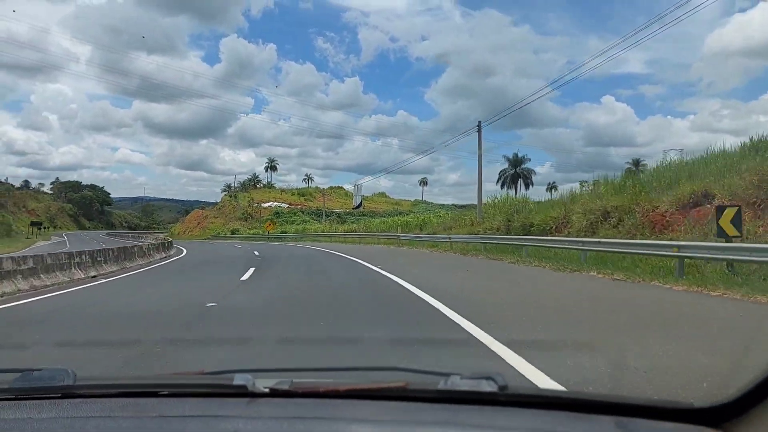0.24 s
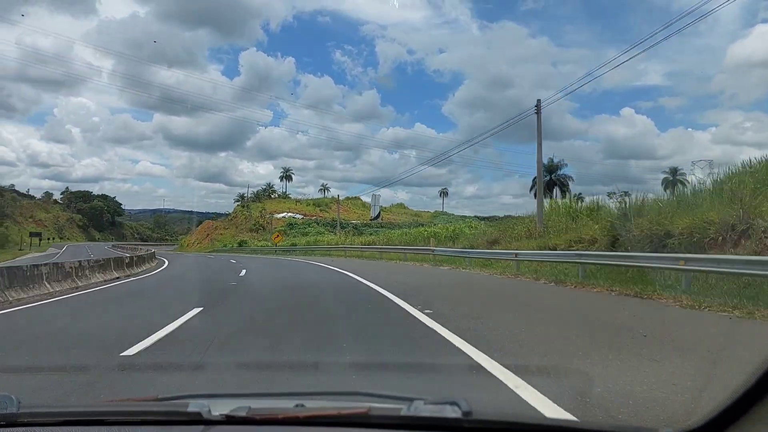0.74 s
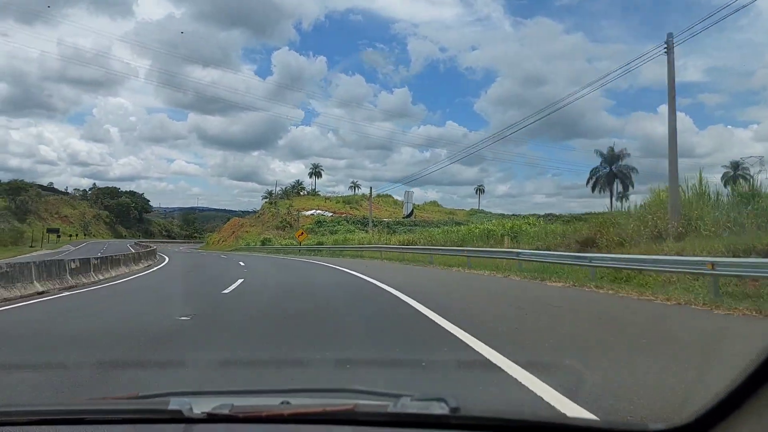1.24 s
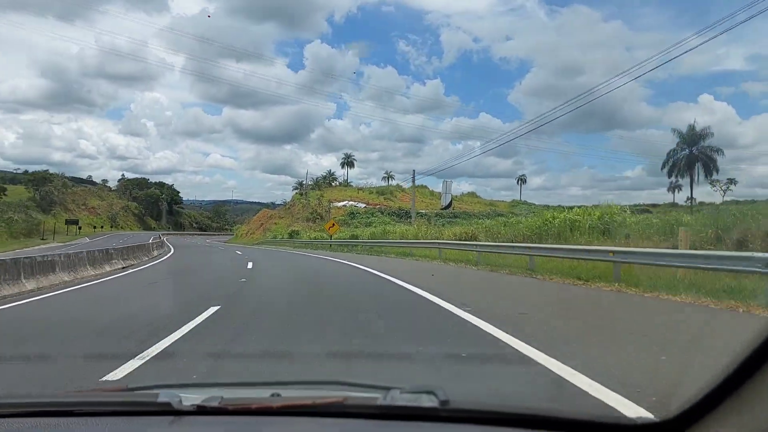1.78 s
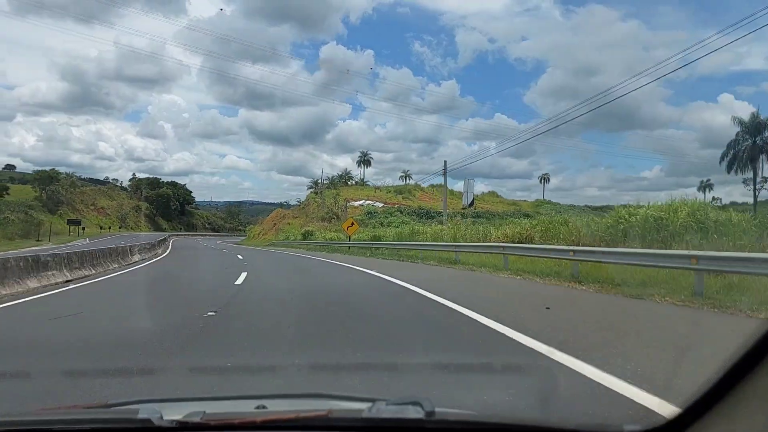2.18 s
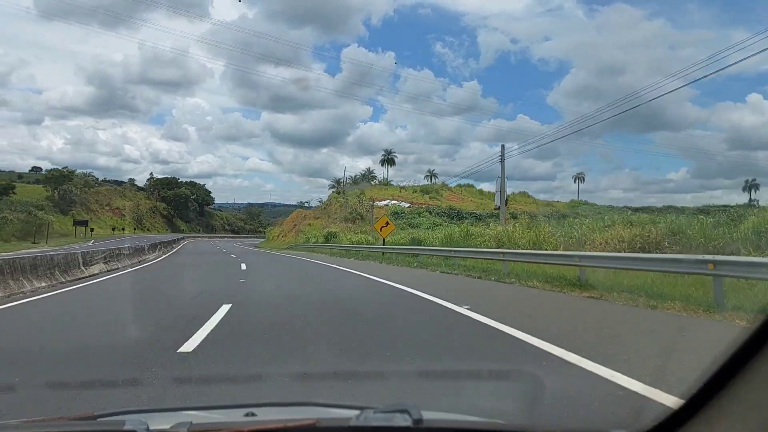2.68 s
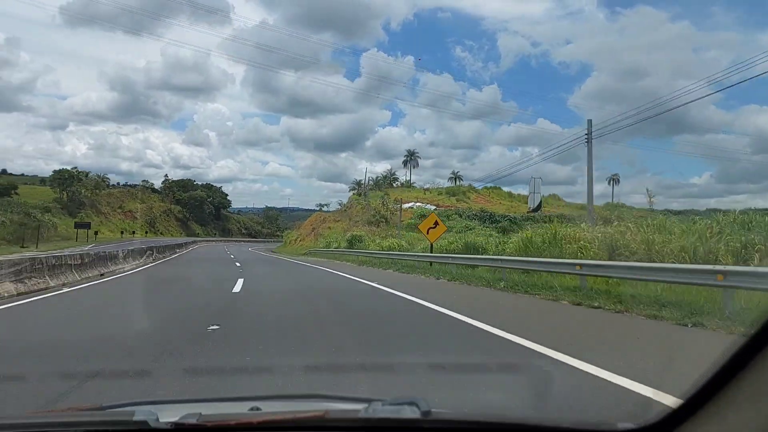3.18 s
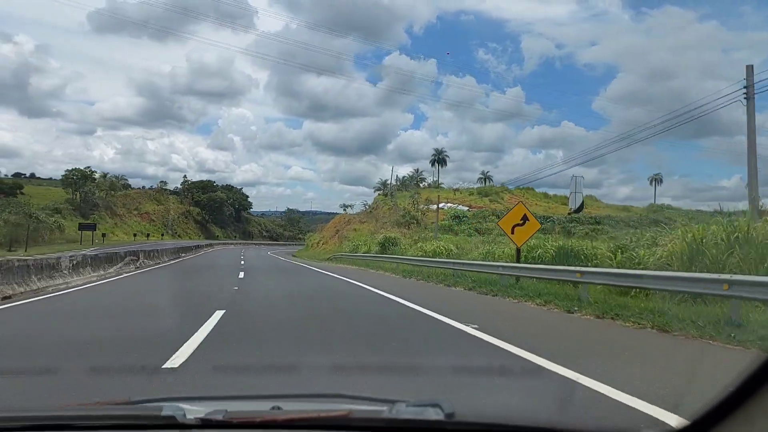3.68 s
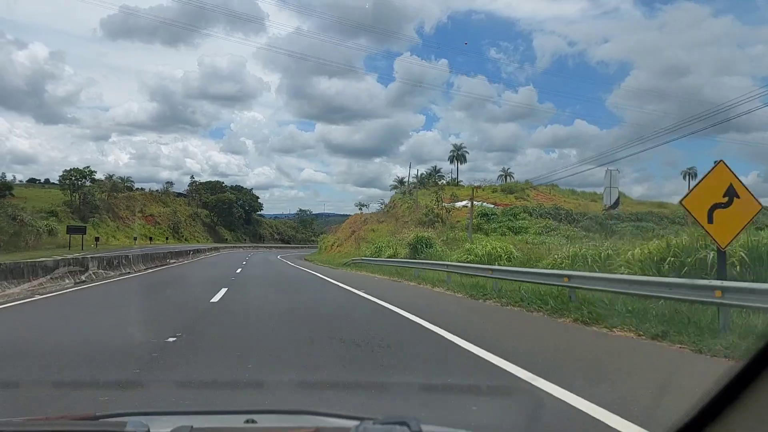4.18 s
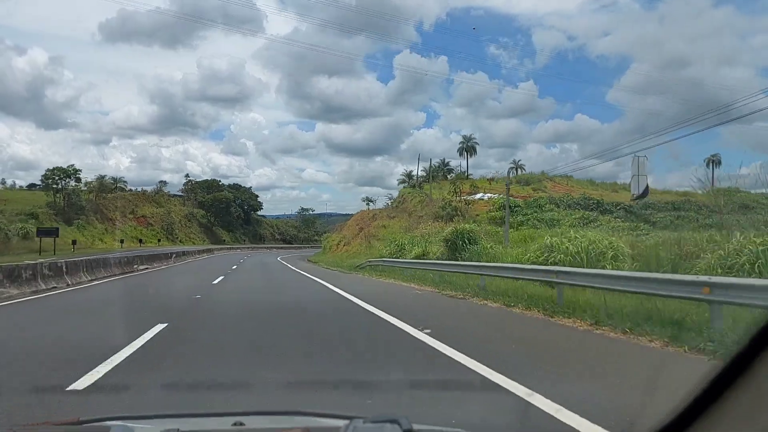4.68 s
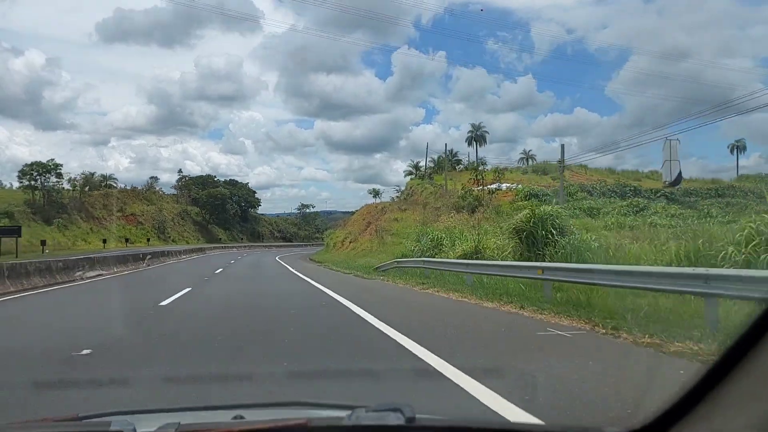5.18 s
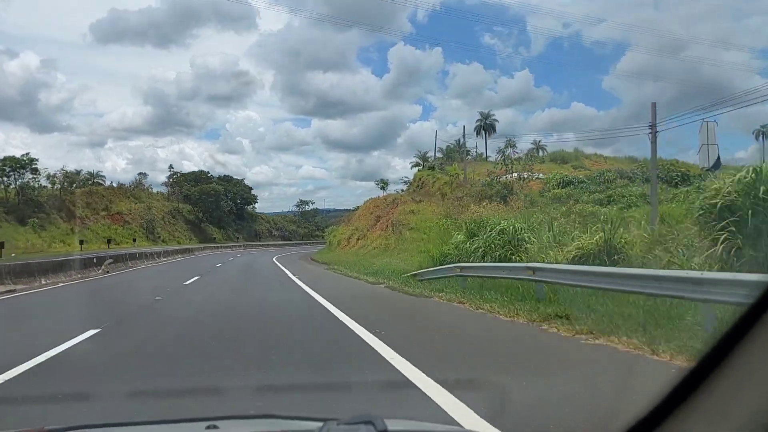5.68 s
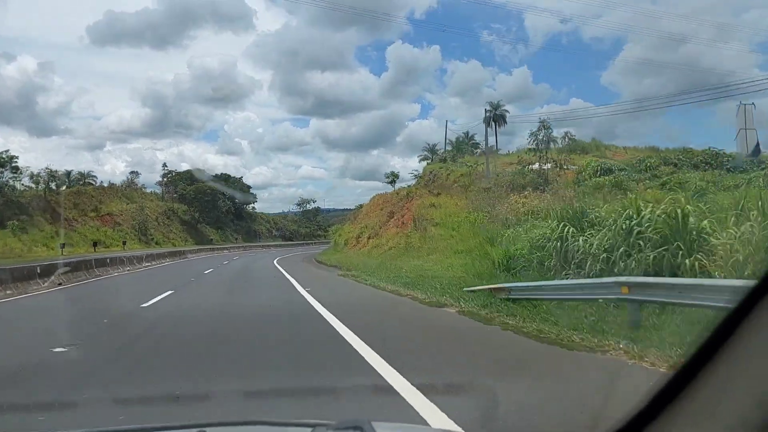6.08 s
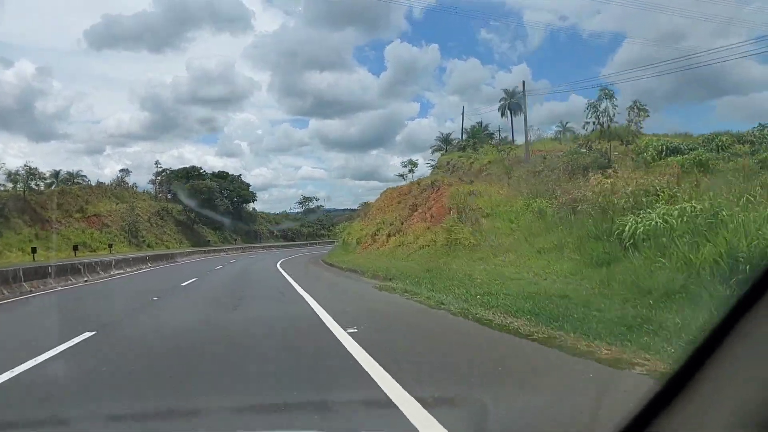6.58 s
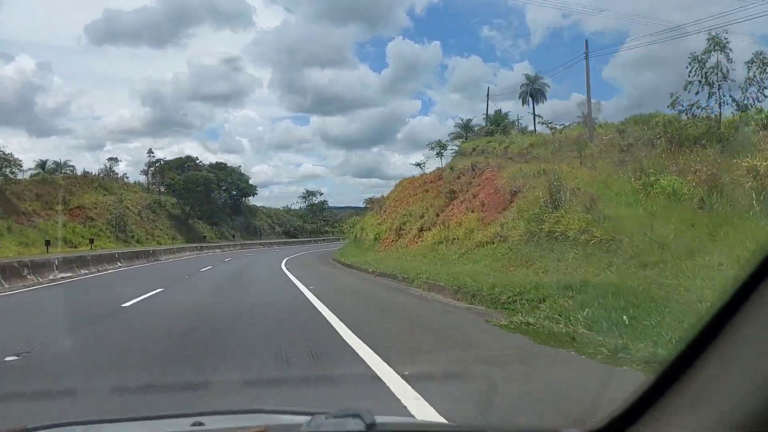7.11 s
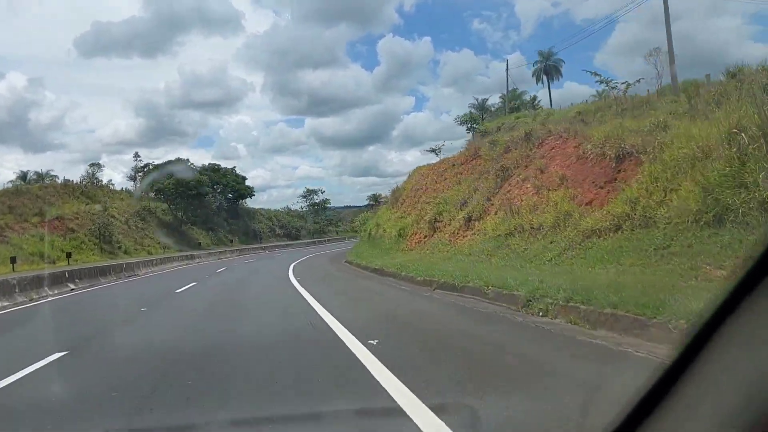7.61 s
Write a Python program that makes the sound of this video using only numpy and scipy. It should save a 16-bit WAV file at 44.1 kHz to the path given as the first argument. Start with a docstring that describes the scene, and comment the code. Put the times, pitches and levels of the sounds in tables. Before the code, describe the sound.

Inside a closed car cruising a highway bend, a deep throbbing boom and uneven road rumble sit under soft tyre roar, with dull bumps.

```python
"""A throbbing boom fills a car as it cruises through highway bends with the windows shut.
Slow tones that stray in strength and phase make the boom and the other wheel hums.
Coloured noise with moving levels makes the road's shake and rumble, the grit, the tread roar and the wind.
The shake and rumble swell as the body heaves; the boom throbs by itself, as near tones beat.
Short filtered pushes and bursts make the bumps, an early draught on the left, and the ticks of loose trim."""
import sys
import numpy as np
from scipy import signal
from scipy.fft import rfft, irfft
from scipy.io import wavfile
from scipy.ndimage import uniform_filter1d, map_coordinates

SR = 44100
rng = np.random.default_rng(int(sys.argv[2]) if len(sys.argv) > 2 else 0)


def transcribe(signal):
    """Save signal, clipped to [-1, 1], as a 16-bit WAV file at the path in sys.argv[1]."""
    frames = np.atleast_2d(signal).T
    limited = np.clip(frames, -1, 1)
    pcm = np.round(limited * 32767).astype(np.int16)
    wavfile.write(sys.argv[1], SR, pcm)


N = 346185
TIME = np.arange(N) / SR  # s
FREQS = np.maximum(np.fft.rfftfreq(N, 1 / SR), 1)  # Hz
SIDE_LAG_S = 0.00042  # how much later direct tread and wind noise reaches the left

# Base level that the tread roar, grit and wind follow: (time [s], level [dB])
RUSH_LEVEL = [(0, -40.5), (.17, -40), (.28, -38.6), (.45, -40.5), (.61, -39.5), (.66, -44), (.85, -41.5),
              (1.2, -43), (1.5, -42), (2.1, -42.5), (2.25, -40.5), (2.75, -39), (2.9, -40.5), (3.9, -40.5),
              (4.05, -41), (4.9, -40.5), (5.9, -38.5), (6.1, -40), (6.55, -39), (6.7, -40), (7.85, -38.5)]
# Coarseness of the asphalt, as a lift of the grit; the dull roar takes a share: (time [s], lift [dB])
ASPHALT_GRAIN = [(0, -0.5), (1.7, -0.5), (3.2, 1), (5.2, -0.5), (7.85, 3)]


def from_db(db):
    """Turn decibels into gain."""
    return 10 ** (np.asarray(db) / 20)


def rms_one(x):
    """Scale a signal to unit power."""
    return x / np.sqrt(np.mean(x ** 2) + 1e-20)


def in_time(rows):
    """Draw each column of a time table as a curve with a value at every sample."""
    times, *columns = np.transpose(rows)
    return [np.interp(TIME, times, column) for column in columns]


def in_frequency(rows):
    """Draw each column of a spectrum as a curve over the logarithm of frequency."""
    hz, *columns = np.transpose(rows)
    return [np.interp(np.log(FREQS), np.log(hz), column) for column in columns]


def drift(rate):
    """Wander smoothly and at random with spread 1, changing about rate times a second."""
    points = rng.standard_normal(1000)
    return rms_one(map_coordinates(points, [TIME * rate + 2], order=2, mode="wrap"))


def swells(times, heights_db, length_s):
    """Add up smooth rises or dips in dB; each is length_s wide where it has fallen to 1/e."""
    return sum(db * np.exp(-(2 * (TIME - s) / length_s) ** 2) for s, db in zip(times, heights_db))


def throbbing(phase, unsteady, rate):
    """Make a tone whose strength and phase both stray at random."""
    in_step = (1 + unsteady * drift(rate)) * np.sin(phase)
    out_of_step = unsteady * drift(rate) * np.cos(phase)
    return in_step + out_of_step


def two_sided(colour_db, lag_s):
    """Mix direct noise, which reaches the left later, with diffuse noise that differs on each side."""
    # What the two sides share: (frequency [Hz], share of power that is direct [0-1], left minus right [dB])
    sides = [(45, 0.91, -5), (86, 0.59, -2.5), (138, 0.75, 1.5), (298, 0.5, -0.5), (436, 0.54, 1.5),
             (600, 0.51, 0), (1010, 0.72, 0), (1250, 0.74, -0.5), (1750, 0.37, -2), (2050, 0.35, -2),
             (2360, 0.09, -1.5), (2940, 0.55, -0.5), (5040, 0, 1), (8000, 0.07, -1), (13000, 0, -3)]
    direct, pan_db = in_frequency(sides)
    source, left, right = rfft(rng.standard_normal((3, N)))
    delayed = source * np.exp(-2j * np.pi * FREQS * lag_s)
    left = np.sqrt(direct) * delayed + np.sqrt(1 - direct) * left
    right = np.sqrt(direct) * source + np.sqrt(1 - direct) * right
    return np.array([left, right]) * from_db(colour_db + np.array([pan_db, -pan_db]) / 2)


def cabin_noise(colour_db, lag_s):
    """Turn a two-sided noise spectrum into stereo sound of unit power."""
    return rms_one(irfft(two_sided(colour_db, lag_s), N))


def steadied(x, span_s):
    """Even out the noise's own swells that last longer than the span."""
    power = uniform_filter1d(np.mean(x ** 2, axis=0), int(span_s * SR))
    return x / np.sqrt(power + 1e-9)


def burst(low_hz, high_hz, t60, alike):
    """Start a stereo band of noise at once and let it die by 60 dB in t60 seconds; peak 1."""
    t = TIME[:SR // 2]
    shared, *own = rng.standard_normal((3, len(t)))
    noise = np.sqrt(alike) * shared + np.sqrt(1 - alike) * np.array(own)
    fading = noise * from_db(-60 * t / t60)
    band = signal.butter(2, [low_hz, high_hz], "band", fs=SR, output="sos")
    x = signal.sosfilt(band, signal.sosfilt(band, fading))  # twice, for steep edges
    return x / np.abs(x).max()


def thump(low_hz, high_hz, t60, shudder_db, alike):
    """Join one sharp push, dulled gradually above its band, to a shudder of noise; peak 1."""
    push = (TIME[:SR // 2] == 0).astype(float)
    band = signal.butter(2, [low_hz, high_hz], "band", fs=SR, output="sos")
    soften = signal.butter(2, high_hz, fs=SR, output="sos")
    knock = signal.sosfilt(soften, signal.sosfilt(band, push))
    shudder = from_db(shudder_db) * burst(low_hz, high_hz, t60, alike)
    x = knock / np.abs(knock).max() + shudder
    return x / np.abs(x).max()


def add(out, s, x):
    """Mix a short sound in at a time in seconds."""
    at = round(s * SR)
    out[:, at:at + x.shape[1]] += x[:, :N - at]


def wheels(throb_db, boom_db=-5.0, beat=0.21, steadying=0.053, stray=0.4, stray_rate=13, spread=0.52):
    """Out-of-round tyres shake the body; the fourth order (4 per turn) meets the cabin's lowest air mode."""
    # Wheel speed: (time [s], speed [turns per s])
    wheel_speed = [(0, 15.0), (.5, 15.12), (1.4, 15.08), (2.2, 14.8), (3.2, 14.65), (4.0, 14.7),
                   (4.7, 14.82), (5.4, 15.02), (7.85, 15.0)]
    # Boom before boom_db and its throb: (time [s], level [dB])
    boom_curve = [(0, -29), (.3, -26), (.7, -18.5), (1.1, -29.5), (1.3, -25.5), (1.55, -22.5), (1.8, -24),
                  (2.2, -28.5), (2.6, -23.5), (3.1, -21), (3.3, -25.5), (3.6, -20), (4.1, -19.5),
                  (4.6, -16.5), (5.1, -17), (5.88, -17.5), (6.0, -30.5), (6.4, -25.5), (6.57, -18.5),
                  (6.75, -32), (7.05, -27), (7.3, -37), (7.55, -19.5), (7.85, -25)]
    # Pitches of the other hums: multiples of the wheel's turning rate
    order_multiples = [3, 8, 10, 12, 20.2]
    # One row for each of those hums: (level [dB], share of the boom curve's swing that it follows)
    order_levels = [(-43, 0), (-38.5, 0.89), (-38, 0.32), (-47, .3), (-44, 0)]
    # Air ringing inside the tyres: (time [s], level [dB])
    tyre_air = [(0, -49), (.9, -47), (1.6, -38.5), (2.3, -35), (3.2, -34.5), (4.2, -43.5), (5.3, -37),
                (6.2, -37.5), (7.0, -43), (7.85, -36)]

    angle = 2 * np.pi * np.cumsum(in_time(wheel_speed)[0]) / SR
    level = in_time(boom_curve)[0]
    swing = level - level.mean()
    unsteady = beat * np.exp(-steadying * swing)  # a strong boom strays less
    boom = throbbing(4 * angle, unsteady, rate=28)
    out = np.sqrt(2) * from_db(level + boom_db + throb_db) * boom * np.ones((2, 1))

    hums = [(multiple, db + follows * swing)
            for multiple, (db, follows) in zip(order_multiples, order_levels)]
    hums.append((15.2, in_time(tyre_air)[0]))  # the tyre air rings at this multiple
    for multiple, level_db in hums:
        # four wheels slip in and out of step, so each hum swells and breaks up
        phase = multiple * angle + spread * drift(3.4) * np.array([[1], [-1]])
        out += from_db(level_db) * throbbing(phase, stray, stray_rate)
    return out


def heaves_and_throb():
    """The body's heaves change the shake and rumble; the boom has its own throb, as near tones beat."""
    # Swells and dips: (time [s], change of shake [dB], boom's own throb [dB], change of rumble [dB])
    swell_table = [(.06, 7, 17, 5.5), (.125, 9, 0, -3), (.24, 4, 9, 2), (.44, 6, -5, 2), (.6, 8, 8.5, 6.5),
                   (.75, 12, -6, -2), (1.37, 3.5, -8, 2), (1.97, 3.5, 5, -1), (2.05, 5, 13, -2),
                   (2.21, 2, 14, 5), (2.39, 11.5, 11, 2.5), (2.5, 7, 9, 5), (2.64, 8, 11.5, 8.5),
                   (2.79, 5, 8.5, 3), (3.0, -1, 11.5, 4.5), (3.1, -2, -3, 1), (3.38, 9.5, 9, -6),
                   (3.6, -5, 9, 1.5), (3.91, -2, 7, 2), (4.03, 4, 0.5, -10), (4.21, 9, 1.5, -0.5),
                   (4.37, -7, 3.5, -0.5), (4.64, -1, 2.5, 1.5), (4.89, 0.5, 2.5, -1.5), (5.27, 9, 3.5, 0.5),
                   (5.55, 5, -7, -2.5), (5.77, -3, 1.5, -2.5), (6.06, 0, 6, 0), (6.165, 0, 1, 7),
                   (6.28, -4, 8, 3.5), (6.5, -2, 1.5, 4.5), (6.84, 3, 10, 7.5), (7.18, 4.5, 7, 11.5),
                   (7.33, 5.5, 3, 2), (7.55, 3, -1.5, 2.5), (7.75, 4, -1, -1)]
    shake_s, short_s = 0.15, 0.062  # widths; the throb and the rumble use the short one
    s, shake_db, throb_db, rumble_db = np.transpose(swell_table)
    return swells(s, shake_db, shake_s), swells(s, throb_db, short_s), swells(s, rumble_db, short_s)


def road(shake_heave_db, rumble_heave_db, shake_db=-32.0, shake_share=0.77, rocking_db=2.5,
         rumble_db=-4.0, lumpy_db=2.0, surge_db=0.2):
    """Long waves in the road shake the body; shorter ones rumble in uneven lumps through the suspension."""
    # Roughness of the road, as the rumble's base level: (time [s], level [dB])
    road_roughness = [(0, -23.5), (.3, -23), (.62, -24), (.68, -28), (1.15, -28.5), (1.9, -24.5),
                      (2.4, -26), (3.1, -22.5), (3.3, -24), (3.7, -26), (3.9, -21.5), (4.4, -25),
                      (4.7, -21), (5.4, -28), (5.88, -23), (6.05, -29.5), (6.5, -25), (6.7, -29),
                      (7.05, -29), (7.6, -24.5), (7.85, -26.5)]
    # Colour of the shake: (frequency [Hz], relative level [dB per Hz])
    shake_colour = [(10, -8), (20, -1), (30, 8), (42, 13), (52, 9), (66, 6), (90, -4.5), (150, -58),
                    (400, -120)]
    # Colour of the rumble: (frequency [Hz], relative level [dB per Hz])
    rumble_colour = [(45, -43), (72, 0.5), (95, -0.5), (135, 4.5), (170, -3), (200, -3), (250, -3),
                     (320, -7.5), (420, -18.5), (800, -101)]

    roughness = in_time(road_roughness)[0]
    shake_level = shake_db + shake_share * (roughness - roughness.mean()) + shake_heave_db
    shake_level = shake_level + rocking_db * drift(18)
    shake_noise = cabin_noise(in_frequency(shake_colour)[0], lag_s=0)
    shake = from_db(shake_level) * steadied(shake_noise, span_s=0.082)

    rumble_level = roughness + rumble_heave_db + rumble_db
    rumble_level = rumble_level + lumpy_db * drift(55) + surge_db * drift(12)
    rumble_noise = cabin_noise(in_frequency(rumble_colour)[0], lag_s=0)
    rumble = from_db(rumble_level) * steadied(rumble_noise, span_s=0.076)
    return shake + rumble


def sway(x):
    """Lean the low sound from ear to ear while the two gains keep the same average."""
    # Lean: (time [s], left minus right [dB])
    lean = [(0, 6.5), (.22, 3.5), (.36, 1.5), (.5, 10.5), (.8, -1), (1.12, -11), (1.35, 0.5), (5.9, 0.5),
            (6.05, -1.5), (7.0, -1.5), (7.3, -1.5)]
    pan = from_db(in_time(lean)[0] * np.array([[1], [-1]]) / 2)
    return x * pan / pan.mean(axis=0)


def bumps():
    """Bumps in the asphalt thud through the floor; sharper edges reach higher."""
    # Bumps: (time [s], peak [dB], lowest frequency [Hz], highest frequency [Hz], shudder's 60 dB decay [s])
    bump_table = [(.212, -14, 100, 260, .05), (.22, -16.5, 130, 560, .07), (.298, -19, 100, 280, .06),
                  (.324, -22.5, 130, 360, 0.041), (.738, -20.5, 129, 540, 0.044),
                  (.862, -26, 220, 560, .05), (1.037, -24, 180, 400, .07), (1.108, -24, 130, 450, .05),
                  (1.155, -24, 220, 680, 0.11), (2.234, -16.5, 100, 296, .09), (2.71, -21, 150, 376, 0.083),
                  (2.885, -22.5, 248, 563, 0.22), (3.474, -16, 131, 300, 0.043),
                  (3.499, -25, 350, 1200, 0.11), (3.59, -18, 110, 380, 0.054), (3.738, -18, 160, 378, .15),
                  (3.754, -15, 238, 600, 0.075), (3.762, -18.5, 240, 560, .1), (3.904, -15, 90, 300, .1),
                  (3.966, -23, 150, 400, 0.052), (4.068, -21.5, 150, 476, .08), (4.681, -20, 90, 352, 0.1),
                  (6.3, -28, 220, 623, .14), (7.313, -13, 100, 400, 0.037)]
    out = np.zeros((2, N))
    for s, peak_db, low_hz, high_hz, t60 in bump_table:
        add(out, s, from_db(peak_db) * thump(low_hz, high_hz, t60, shudder_db=1.0, alike=0.29))
    return out


def buffets(right_db=-31.0):
    """Puffs of draught thump on the left and barely reach the right."""
    # Puffs: (time [s], left peak [dB], lowest frequency [Hz], highest frequency [Hz], 60 dB decay [s])
    puff_table = [(.054, -8.5, 110, 345, 0.046), (.063, -6, 170, 440, .04), (.079, -12.5, 220, 560, .09),
                  (.401, -5, 120, 360, 0.047), (.408, -6, 109, 293, 0.063), (.483, -16, 110, 260, .04),
                  (.533, -13.5, 110, 278, 0.092), (.579, -7.5, 110, 302, 0.11), (.598, -9, 119, 384, .06),
                  (.628, -10, 120, 300, .03)]
    out = np.zeros((2, N))
    for s, peak_db, low_hz, high_hz, t60 in puff_table:
        add(out, s, from_db(peak_db) * thump(low_hz, high_hz, t60, shudder_db=-1.5, alike=0.25))
    return out * from_db([[0], [right_db]])


def tread(dull_db=2.0, bright_db=0.37, grain_share=0.41, split_hz=1750, flutter_db=1.66):
    """Tread blocks slap the asphalt; their roar comes in from the right and rings in the cabin."""
    # Colour of the roar: (frequency [Hz], relative level [dB per Hz])
    roar_colour = [(400, -40), (750, -0.5), (1000, 2.16), (1400, 1.5), (1750, 0), (2000, -3.5), (2200, -3),
                   (2500, -7.5), (2800, -9.5), (3200, -15), (4200, -21.5), (7000, -60)]
    # Cabin resonances: (frequency [Hz], width [Hz], boost in step on both sides [dB], boost opposed [dB])
    cabin_modes = [(1128, 163, 8, 0), (1243, 155, -1.5, 3), (1317, 63, 3.5, -0.5), (1470, 79, -2.5, 3),
                   (1640, 57, 4.5, 8), (1978, 60, 5, 2), (2050, 88, -3.5, 5.5), (2313, 90, 1.5, 4.5),
                   (2414, 80, 4.5, 2), (2470, 87, 3.5, -2), (2650, 96, 2, -7), (3910, 260, 3.5, -10)]
    # Bright part of the roar, before bright_db: (time [s], level [dB])
    bright_curve = [(0, 0), (1.5, 0.5), (2.6, 0.5), (3.7, 0.5), (4.5, -0.5), (5.4, 0.2), (6.6, -2.1),
                    (7.85, -2.3)]

    left, right = two_sided(in_frequency(roar_colour)[0], SIDE_LAG_S)
    mid, side = left + right, left - right  # in step, opposed
    for hz, width, mid_db, side_db in cabin_modes:
        nearness = 1 / (1 + (2 * (FREQS - hz) / width) ** 2)
        mid = mid * from_db(mid_db * nearness)
        side = side * from_db(side_db * nearness)
    roar = rms_one(irfft(np.array([mid + side, mid - side]), N))

    # the surface sets the balance of dull and bright
    dull = irfft(rfft(roar) / (1 + (FREQS / split_hz) ** 6), N)
    bright = roar - dull
    dull_level = grain_share * in_time(ASPHALT_GRAIN)[0] + dull_db + flutter_db * drift(55)
    bright_level = in_time(bright_curve)[0] + bright_db + flutter_db * drift(55)
    return from_db(in_time(RUSH_LEVEL)[0]) * (from_db(dull_level) * dull + from_db(bright_level) * bright)


def grit(level_db=2.5, gritty_db=2.0):
    """The stones of the asphalt growl through the tyres."""
    # Colour of the growl: (frequency [Hz], relative level [dB per Hz])
    grit_colour = [(180, -69), (290, -4.5), (370, 0), (440, -1), (530, -1.5), (610, -5), (700, -7.5),
                   (900, -17.5), (1600, -50.5)]
    level = in_time(RUSH_LEVEL)[0] + in_time(ASPHALT_GRAIN)[0] + level_db + gritty_db * drift(50)
    return from_db(level) * cabin_noise(in_frequency(grit_colour)[0], lag_s=0.00055)


def wind(level_db=-17.0, flutter_db=1.0, glint_db=1.5, glint_hz=10000):
    """Air hisses past the door seals and pillars; its highest part also flickers by itself."""
    # Colour of the hiss: (frequency [Hz], relative level [dB per Hz])
    wind_colour = [(1500, -24), (3000, 11), (3800, 7.5), (4500, 8.5), (5200, 5.5), (7000, 3), (8500, -1.5),
                   (10000, -4), (11500, -2), (15500, -9)]
    # Top of the hiss, before its flicker: (time [s], level relative to the rest [dB])
    glint_curve = [(0, 0), (1.5, 1.5), (2.8, 2), (4.5, 2), (6.4, 1.5), (7.3, 0), (7.85, 2)]
    hiss = cabin_noise(in_frequency(wind_colour)[0], SIDE_LAG_S)
    top = irfft(rfft(hiss) / (1 + (glint_hz / FREQS) ** 8), N)
    top_gain = from_db(in_time(glint_curve)[0] + glint_db * drift(20))
    hiss = hiss + (top_gain - 1) * top
    return from_db(in_time(RUSH_LEVEL)[0] + level_db + flutter_db * drift(40)) * hiss


def ticks(span=1.35, snap_db=-8.0):
    """Loose plastic trim gives small dry ticks: a wide snap and a short ring of narrower noise."""
    # Ticks: (time [s], ring's peak before panning [dB], pitch [Hz], ring's 60 dB decay [s],
    # left minus right [dB])
    tick_table = [(0.114, -34.5, 4470, .02, 3), (.114, -44, 9500, .03, -3), (.187, -55, 13000, .15, -2),
                  (.227, -42, 12400, 0.13, -6), (.227, -43, 3900, .033, 7), (0.281, -36.5, 4570, 0.011, 5),
                  (.292, -45, 4800, .015, 8), (3.15, -47, 5000, .2, 1), (3.169, -44, 6000, .18, 1),
                  (3.17, -51, 13000, .2, 0), (3.191, -46, 6900, .16, 0), (3.223, -46, 3800, .04, 0),
                  (3.268, -42, 11500, .06, 4), (3.268, -42, 6000, .047, 0), (4.453, -46.5, 10500, .09, 0),
                  (4.524, -52, 10000, .04, 0), (5.214, -38, 2800, .06, 0), (5.216, -48, 10000, .04, 0),
                  (7.463, -47.5, 7500, .08, -1)]
    out = np.zeros((2, N))
    for s, peak_db, hz, t60, pan_db in tick_table:
        pan = from_db(np.array([[pan_db], [-pan_db]]) / 2)
        snap = from_db(snap_db) * burst(2600, 11500, t60=0.008, alike=0.18)
        ring = burst(hz / span, hz * span, t60, alike=0.074)
        add(out, s, from_db(peak_db) * pan * (snap + ring))
    return out


def scene():
    """Mix everything heard in the cabin; brief dips lower the wheels and road, and the roar a little."""
    # Brief dips of the low sound: (time [s], change [dB])
    dip_table = [(.18, -5), (.68, -5), (.94, -1.5), (1.25, -2.5), (1.8, -4), (1.9, -6), (2.14, -3),
                 (2.715, -3), (2.91, -10), (3.25, -8.5), (3.515, -7.5), (4.155, -8), (4.465, -17),
                 (4.835, -4.5), (4.985, -5.5), (5.21, -3), (5.98, -5), (6.11, -5), (6.21, -7.5), (6.66, -8),
                 (7.26, -5.5)]
    dip_s, roar_share = 0.041, 0.2  # width of a dip; share of it that the roar and grit take
    shake_heave, boom_throb, rumble_heave = heaves_and_throb()
    dip_db = swells(*np.transpose(dip_table), dip_s)
    low = from_db(dip_db) * sway(wheels(boom_throb) + road(shake_heave, rumble_heave))
    roar = from_db(roar_share * dip_db) * (tread() + grit())
    return low + bumps() + buffets() + roar + wind() + ticks()


def record(dry, cutoff_hz=15500):
    """Cut the very top of the sound away steeply."""
    return irfft(rfft(dry) / np.sqrt(1 + (FREQS / cutoff_hz) ** 200), N)


dry = scene()
out = record(dry)
transcribe(out)
```